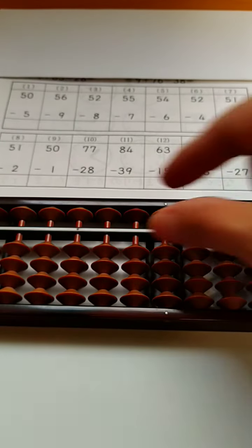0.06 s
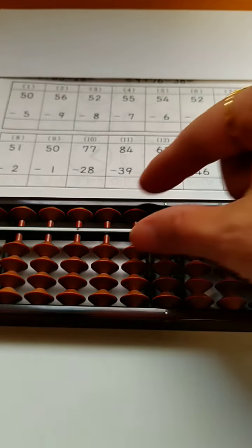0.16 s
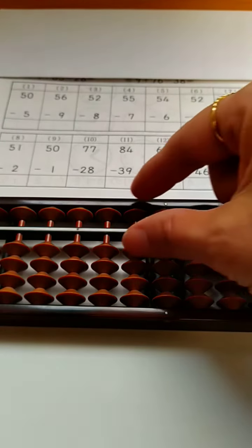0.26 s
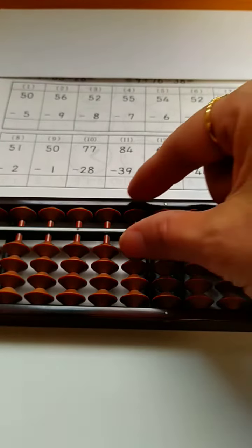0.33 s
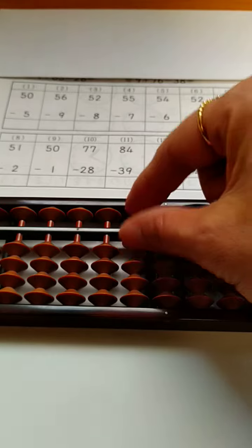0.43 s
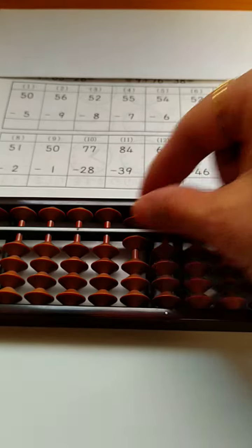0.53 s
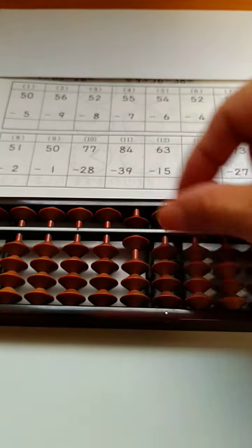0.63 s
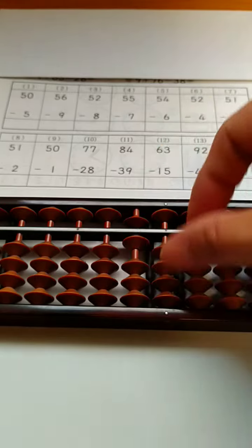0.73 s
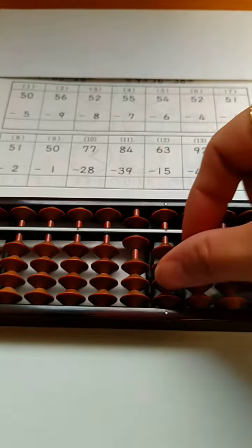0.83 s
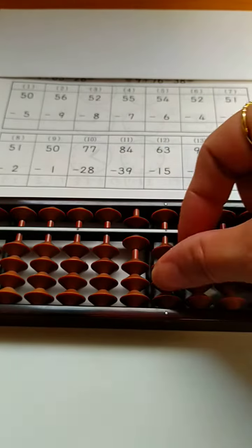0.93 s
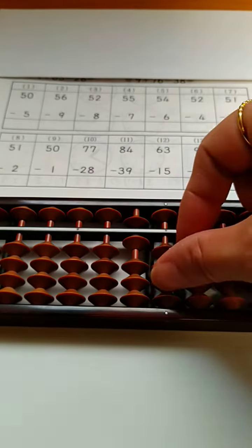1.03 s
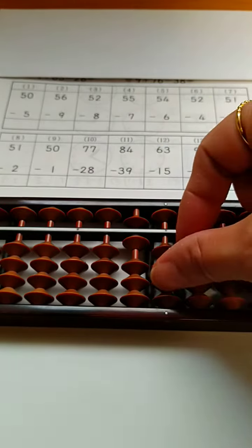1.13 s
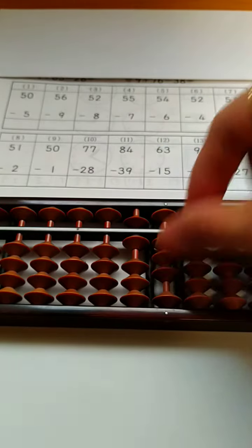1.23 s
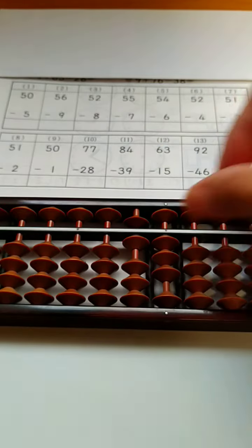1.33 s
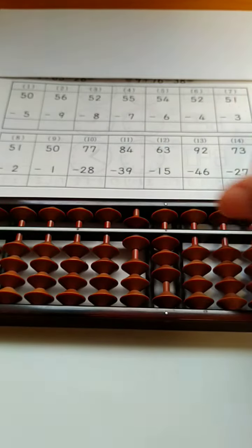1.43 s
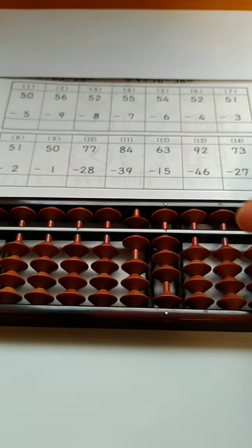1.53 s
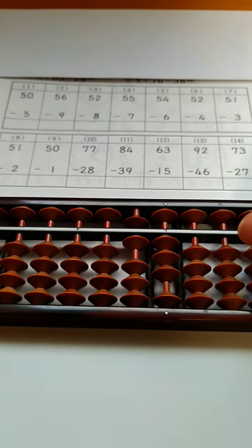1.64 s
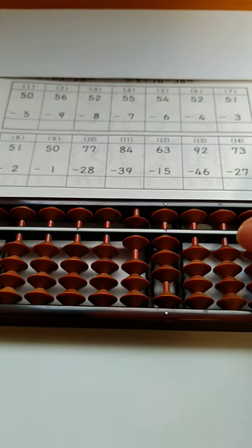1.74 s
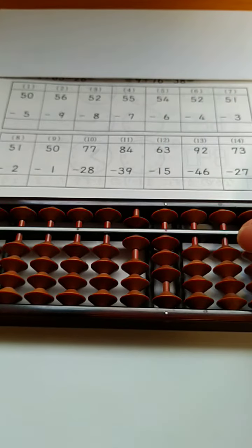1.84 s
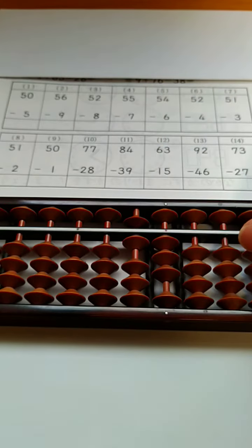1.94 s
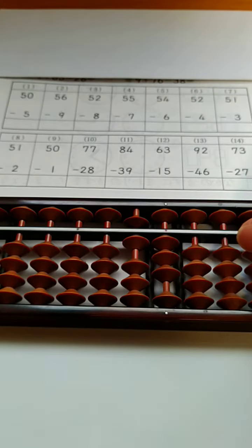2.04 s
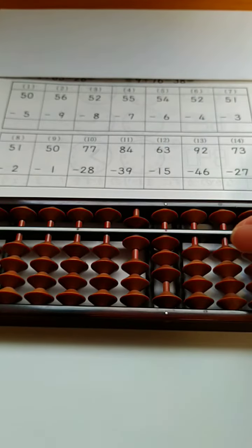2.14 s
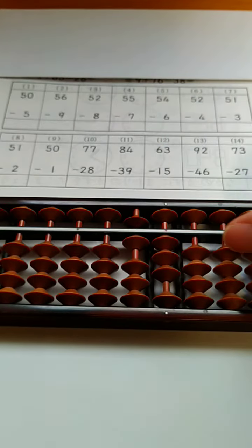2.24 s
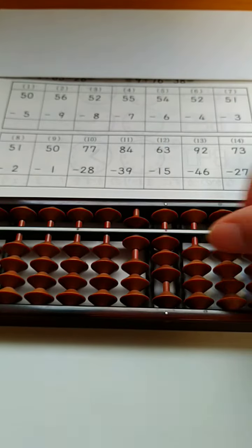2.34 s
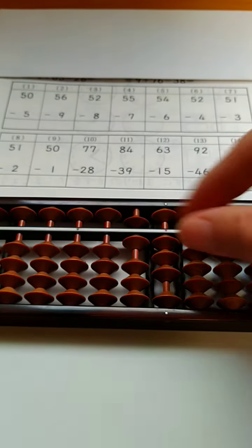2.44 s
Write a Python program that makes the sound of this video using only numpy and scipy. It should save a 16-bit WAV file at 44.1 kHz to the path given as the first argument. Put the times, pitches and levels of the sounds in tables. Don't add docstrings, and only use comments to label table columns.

```python
import sys
import numpy as np
from scipy import signal
from scipy.fft import rfft, irfft
from scipy.io import wavfile
from scipy.ndimage import uniform_filter1d

SR = 44100
rng = np.random.default_rng(int(sys.argv[2]) if len(sys.argv) > 2 else 0)


def natural_amplitude(level_db):
    exponent = np.asarray(level_db, float) / 20
    return 10 ** exponent


def int16_out(signal):
    q = np.round(np.clip(np.atleast_2d(signal).T, -1, 1) * 32767)
    wavfile.write(sys.argv[1], SR, q.astype(np.int16))


N = 110250


def read(points, hz):
    f, value = np.transpose(points)
    return np.interp(np.log(hz + 1), np.log(f + 1), value)


def evened(x):
    return x / np.sqrt(np.mean(x ** 2) + 1e-20)


def sides(pan_db):
    return natural_amplitude(np.array([[.5], [-.5]]) * pan_db)


def add(mix, s, sound):
    part = mix[..., round(s * SR):][..., :sound.shape[-1]]
    part += sound[..., :part.shape[-1]]


def shaped(x, points):
    hz = np.fft.rfftfreq(x.shape[-1], 1 / SR)
    return irfft(rfft(x) * natural_amplitude(read(points, hz)), x.shape[-1])


def pair(same):
    a, b = rng.standard_normal((2, N))
    return np.array([a, same * a + np.sqrt(1 - same ** 2) * b])


def ring(t, hz, t60, phase=0):
    return natural_amplitude(-60 * t / t60) * np.sin(2 * np.pi * hz * t + phase)


# (time [s], low drone level [dB], middle drone level [dB], upper drone level [dB])
DRONE_SWELLS = [(0.0, -73.5, -74.5, -89), (0.21, -63, -67, -70), (0.3, -59, -79, -64.5),
                (0.4, -73, -72, -78.5), (.6, -68, -70, -65), (0.89, -75, -76, -58),
                (0.93, -67.5, -73.5, -69), (1.15, -59.5, -69, -67), (1.43, -69.5, -65, -61),
                (1.61, -66.5, -71, -77), (1.69, -54.5, -75, -62.5), (1.89, -81, -79, -66.5),
                (2.0, -58.5, -76, -70), (2.16, -75, -77, -67.5), (2.21, -64.5, -69, -84),
                (2.26, -68, -72, -57), (2.31, -78, -77, -65), (2.46, -58.5, -67, -71)]
# (pitch [Hz]), then (pitch wander [Hz])
DRONE_HZ = (57.1, 120.9, 217.65)
WANDER_HZ = (4.92, 5.22, 7.05)


def drones():
    time, *levels_db = np.transpose(DRONE_SWELLS)
    wander = uniform_filter1d(rng.standard_normal((len(DRONE_HZ), N)), size=1500)
    wander = evened(uniform_filter1d(wander, size=1500))
    out = np.zeros(N)
    for hz, by, w, db in zip(DRONE_HZ, WANDER_HZ, wander, levels_db):
        swell = natural_amplitude(np.interp(np.arange(N) / SR, time, db))
        phase = 2 * np.pi * np.cumsum(hz + by * (w - w.mean())) / SR
        out += np.sqrt(2) * swell * np.sin(phase)
    return out


# (frequency [Hz], width [Hz], level [dB])
HUM_RESONANCES = [(56.4, 9.6, -71.5), (126, 28, -72), (91.4, 33, -71), (215.8, 39, -71), (186, 37, -72.5),
                  (288.5, 140, -80), (390, 68, -86)]
# (frequency [Hz], density [dB per Hz])
RUMBLE_COLOUR = [(20, -27.5), (45, 1.5), (250, -8.5), (500, -16), (1000, -18.5), (2000, -25.5), (5000, -45)]


def hum():
    same, rumble_db, pan_db, left_lag_s = 0.92, -73.5, -5, 0.00038
    hz = np.fft.rfftfreq(N, 1 / SR)
    power = sum(natural_amplitude(2 * db) / w / (1 + (2 * (hz - f) / w) ** 2) ** 2 for f, w, db in HUM_RESONANCES)
    resonances = irfft(rfft(pair(same)) * np.sqrt(power * SR * 2 / np.pi), N)
    rumble = natural_amplitude(rumble_db) * evened(shaped(pair(same), RUMBLE_COLOUR))
    both = drones() + resonances + rumble
    lag = np.exp(-2j * np.pi * hz * left_lag_s * np.array([[1], [0]]))
    return irfft(rfft(both) * lag, N) * sides(pan_db)


# (frequency [Hz], density [dB per Hz])
HISS_COLOUR = [(500, -1), (1000, -4), (7500, -6.5), (10000, -2), (11700, 1), (12600, -6.5), (15800, -4.5),
               (16050, -40)]


def hiss():
    level_db, flutter_db, pan_db, same = -68, 0.6, -3.5, 0.017
    flutter = evened(uniform_filter1d(rng.standard_normal((2, N)), size=3000))
    noise = evened(shaped(pair(same), [(150, -54)] + list(HISS_COLOUR)))
    return natural_amplitude(level_db + flutter_db * flutter) * noise * sides(pan_db)


# (time [s], length [s], level [dB])
SCUFFS = [
    (0.162, 0.0054, -60),
    (0.199, 0.035, -65.5),
    (0.266, 0.046, -59),
    (0.303, 0.034, -57),
    (1.021, 0.047, -58.5),
]
# (frequency [Hz], density [dB per Hz])
SCUFF_COLOUR = [(500, -19.5), (1800, -4), (3200, -1.5), (5500, 0.5), (9000, -10.5), (14000, -28)]


def scuffs():
    grains_per_s = 1200
    t = np.arange(N) / SR
    sizes = natural_amplitude(2.3 * np.minimum(rng.exponential(1, N), 2))
    grains = sizes * (rng.random(N) < grains_per_s / SR)
    grit = evened(shaped(pair(0.9) * uniform_filter1d(grains, size=40), SCUFF_COLOUR))
    drag = sum(natural_amplitude(db) * np.sin(np.pi * np.clip((t - s) / length, 0, 1)) for s, length, db in SCUFFS)
    return grit * drag


# (time [s], ring level [dB], bead pitch [Hz], crack level [dB], left-right [dB])
CONTACTS = [(.202, -61.5, 10500, -68, -25), (.2135, -56, 10900, -45, -9), (.2372, -20, 13640, -24, 7),
            (.2378, -26, 11000, -29.5, -7.5), (.2383, -20, 11380, -22, 7), (.2388, -24.5, 11500, -21.5, -5),
            (.2395, -33.5, 12500, -28.5, 0.5), (.2612, -18.5, 11900, -27, -1),
            (.2614, -13.5, 11410, -34, 9), (.262, -17, 11600, -31, 2.5), (.2625, -13.5, 11060, -26, -10.5),
            (.2632, -30, 10630, -28, -10), (.2641, -29, 11300, -31.5, 1), (.2695, -42.5, 11300, -52, 2),
            (.276, -46, 11400, -58, 5), (.289, -43.5, 11300, -42, -0.5), (.2925, -37, 11000, -56, -1.5),
            (.2992, -42, 11300, -45, 3.5), (.3028, -46, 11000, -51.5, -4), (.3077, -43.5, 11100, -46, -9.5),
            (.3118, -38, 12200, -46, 1.5), (.3132, -34.5, 10900, -44, -2.5), (.318, -48, 10960, -49, 0),
            (.322, -44, 11700, -41, 1), (.3402, -50, 11200, -58, 0), (1.0191, -18, 10480, -22.5, 2.5),
            (1.0198, -18, 11060, -22.5, 0), (1.0206, -15, 10900, -36.5, -9.5),
            (1.0215, -14.5, 10340, -20.5, -4.5), (1.0225, -39, 10500, -35, 10.5),
            (1.0232, -24, 10700, -32.5, -4.5), (1.032, -39, 10500, -52, -10), (1.0385, -35, 10100, -45, -8),
            (1.0555, -46, 10600, -50, -17), (1.0005, -51, 11000, -58, 0), (1.005, -53, 10900, -63, -4),
            (1.009, -59, 11300, -62, 5)]
NEXT_BEAD_S = [.25, .6]
# (multiple of pitch, t60 [s], first bead level [dB], second bead level [dB],
# third bead level [dB])
BEAD_MODES = [(0.992, 0.0056, 4, 4.5, 4), (0.82, .0045, -5.5, -11.5, -12.5), (.755, .007, -10.5, -11, -9),
              (0.59, 0.0087, -9.5, -16, -18.5), (0.459, 0.0076, -15, -17, -24.5),
              (.38, 0.0054, -7.5, -22.5, -13.5), (1.2, 0.0034, -7, -21, -6.5),
              (0.2535, 0.011, -25.5, -32.5, -31), (0.97, 0.0053, -18, -12, -17),
              (.66, .006, -17.5, -27, -28), (0.412, 0.0064, -31, -18.5, -20)]
# (frequency [Hz], density [dB per Hz])
CRACK_COLOUR = [(600, -50), (1800, -28.5), (4300, -15.5), (6500, -13), (9000, -8), (11300, -6), (14500, -6),
                (16500, -14.5)]


def beads():
    crack_t60_s, detune, right_lead_s, attack_s = 0.0045, 0.011, 0.00014, 0.00015
    out, t = np.zeros((2, 2, N)), np.arange(1024) / SR
    for s, ring_db, hz, crack_db, pan_db in CONTACTS:
        bead = np.searchsorted(NEXT_BEAD_S, s)
        modes = 0
        for i, (k, t60, *db) in enumerate(BEAD_MODES):
            chance = rng.uniform(-0.95, 1, 3)
            mode_hz = hz * k * (1 + detune * chance[0] * (i > 0))
            modes = modes + natural_amplitude(db[bead]) * ring(t, mode_hz, t60, np.pi * chance[1:, None])
        grit = rng.standard_normal((2, 1024))
        crack = evened(shaped(grit, CRACK_COLOUR)) * natural_amplitude(-60 * t / crack_t60_s)
        knock = np.array([natural_amplitude(ring_db) * modes, natural_amplitude(crack_db) * crack])
        knock = knock * np.minimum(t / attack_s, 1) * sides(pan_db)
        add(out[:, 0], s + right_lead_s / 2, knock[:, 0])
        add(out[:, 1], s - right_lead_s / 2, knock[:, 1])
    return out


# (time [s], level [dB], pitch [Hz], overtone level [dB])
THUMPS = [
    (.203, -44.5, 360.8, -28.5),
    (.238, -68, 382, 11.5),
    (0.263, -49.5, 374, -8.5),
    (0.312, -48.5, 374.7, -18.5),
    (1.020, -41, 368.5, -6),
]
# (multiple of pitch, level [dB], t60 [s])
FRAME_OVERTONES = [(3.08, 3.5, 0.03), (3.7, -4.5, 0.023), (1.65, -10, 0.055), (5.9, -3.5, 0.028),
                   (7.2, -1, 0.073)]


def frame():
    t60_s, rise_s, pan_db = 0.13, 0.0047, -5
    out, t = np.zeros((2, N)), np.arange(12000) / SR
    for s, db, hz, over_db in THUMPS:
        low = ring(t, hz, t60_s) + 0.54 * ring(t, 1.085 * hz, t60_s)
        low = low + natural_amplitude(-6) * ring(t, 0.891 * hz, 0.0714)
        low = (1 - np.exp(-t / rise_s)) * low
        high = sum(natural_amplitude(over_db + d) * ring(t, hz * k, t60) for k, d, t60 in FRAME_OVERTONES)
        add(out, s, natural_amplitude(db) * (low + high) * sides(pan_db))
    return out


def wall(x):
    delay_s, spread_s, level_db = .0222, .0007, -20
    t = np.arange(2048) / SR
    smear = rng.standard_normal((2, 2048)) * np.exp(-((t - delay_s) / spread_s) ** 2)
    return natural_amplitude(level_db) * signal.fftconvolve(x, smear / np.linalg.norm(smear[0]), axes=1)[:, :N]


# (frequency [Hz], t60 [s])
ROOM_T60 = [(500, 0.35), (1100, 0.26), (2000, 0.13), (5000, 0.24), (11000, 0.24), (16000, 0.13)]
# (frequency [Hz], level [dB])
ROOM_COLOUR = [(500, -2), (1200, -2), (2000, -1), (5000, 1.5), (8000, -3), (11000, -2.5), (15300, -6),
               (16200, -31.5)]


def room(x):
    level_db, rise_s = -14, 0.019
    echoes = np.zeros((2, SR // 2))
    at = np.arange(200, SR // 2 - 20, 20) + rng.integers(0, 20, (2, (SR // 2 - 201) // 20))
    np.put_along_axis(echoes, at, rng.choice([-1., 1.], at.shape), 1)
    hz, t, z = signal.stft(echoes, SR, nperseg=256)
    decay_db = read(ROOM_COLOUR, hz)[:, None] - 60 * t / read(ROOM_T60, hz)[:, None]
    z = z * natural_amplitude(decay_db) * np.minimum(0.5 + t / rise_s, 1.3)
    tail = signal.istft(z, SR, nperseg=256)[1]
    return natural_amplitude(level_db) * signal.fftconvolve(x, tail / np.linalg.norm(tail[0]), axes=1)[:, :N]


# (time [s], level [dB], pitch [Hz], t60 [s], left-right [dB])
TAPS = [(1.397, -59.5, 473, 0.091, 7.5), (1.396, -61, 1174, 0.021, 9), (1.4, -69, 786, 0.05, 12),
        (1.408, -62.5, 1032, 0.042, 15), (1.408, -65.5, 548, 0.12, 11), (1.429, -63.5, 2126, 0.03, 5),
        (1.549, -68, 420, 0.16, 8), (1.55, -68, 1140, 0.036, 14), (1.571, -66, 1114, .04, 9.5),
        (1.579, -62, 1140, 0.026, 10), (1.578, -68, 432, .07, 10), (1.973, -67.5, 1475, 0.046, 15),
        (1.975, -67, 2300, 0.027, 0), (2.078, -64, 2180, 0.023, 0), (2.078, -66.5, 1550, 0.023, 8)]


def far_taps():
    out, t = np.zeros((2, N)), np.arange(6000) / SR
    for s, db, hz, t60, pan_db in TAPS:
        tap = ring(t, hz, t60) + .5 * ring(t, 1.08 * hz, t60)
        soft_attack = np.minimum(t / 0.0025, 1)
        add(out, s, natural_amplitude(db) * soft_attack * tap * sides(pan_db))
    return out


def scene():
    floor = hum() + hiss()
    dull = scuffs() + frame()
    rings, cracks = beads()
    sent = natural_amplitude(-5.5) * rings + natural_amplitude(5) * cracks + dull
    return floor + dull + rings + cracks + wall(rings + cracks) + room(sent) + far_taps()


# (frequency [Hz], level [dB])
MIC_EDGES = [(20, -23.5), (42, -9), (55, -0.5), (15900, 0), (16300, -13), (17100, -29.5)]


def top_cut(x):
    return signal.sosfilt(signal.butter(12, 16995, fs=SR, output="sos"), x)


def record(dry):
    mix = shaped(dry, MIC_EDGES)
    return top_cut(mix)


dry = scene()
out = record(dry)
int16_out(out)
```